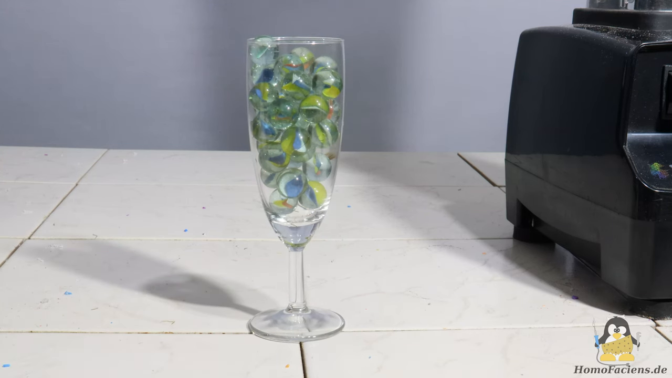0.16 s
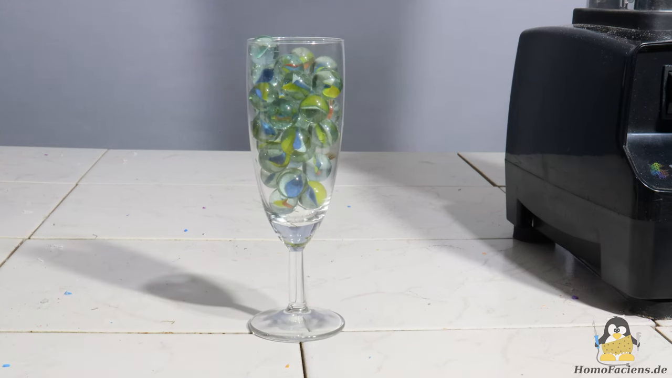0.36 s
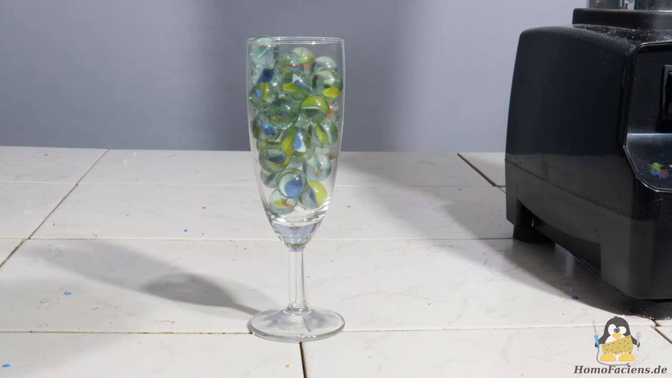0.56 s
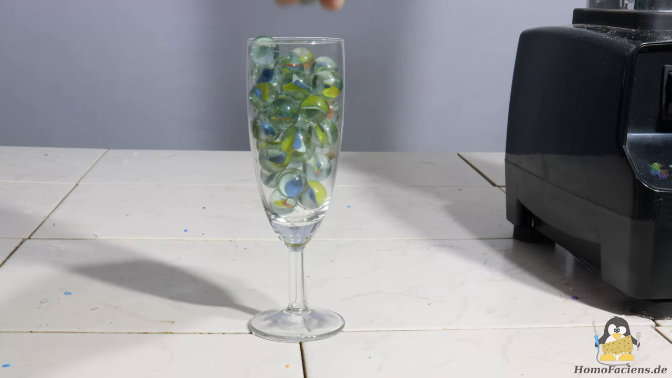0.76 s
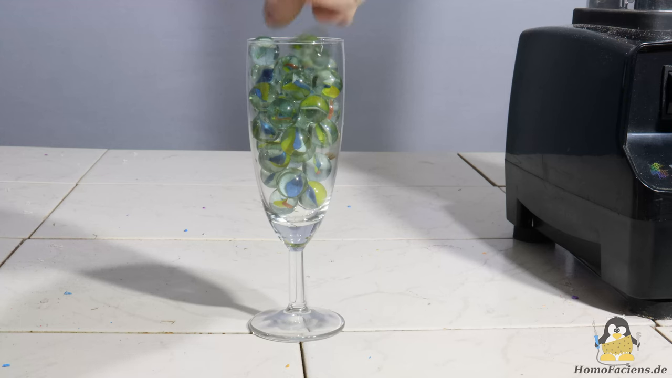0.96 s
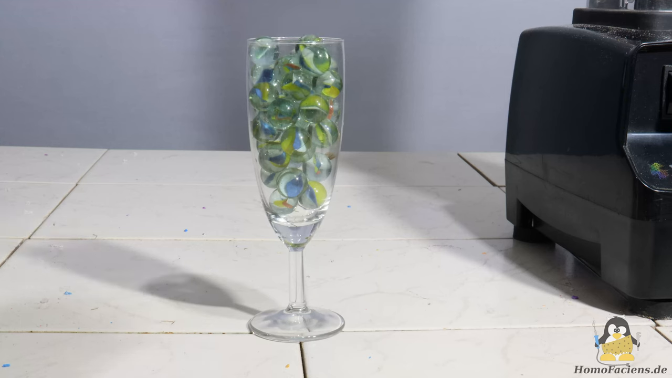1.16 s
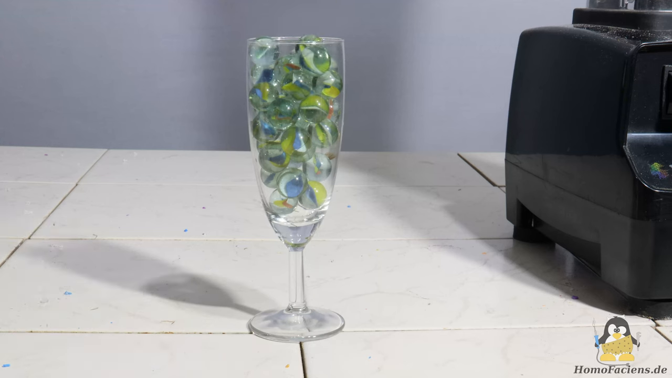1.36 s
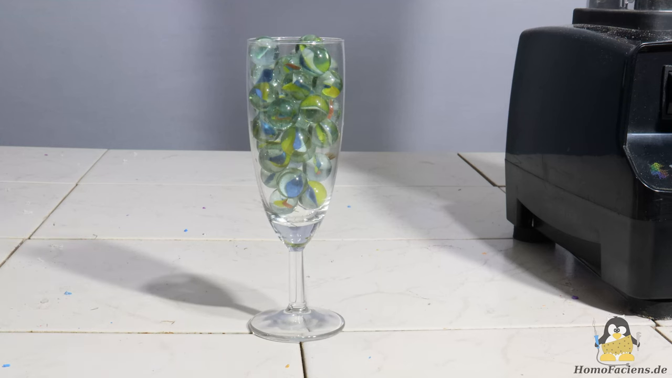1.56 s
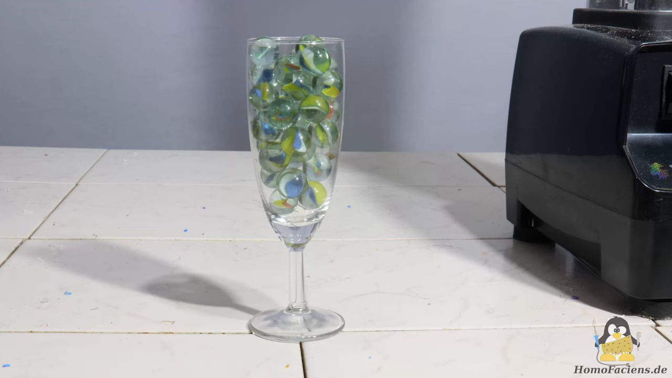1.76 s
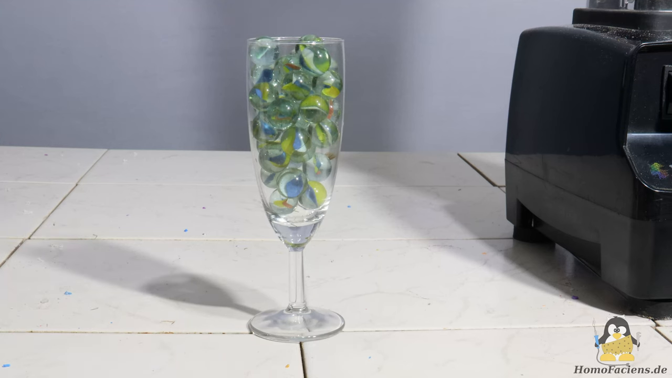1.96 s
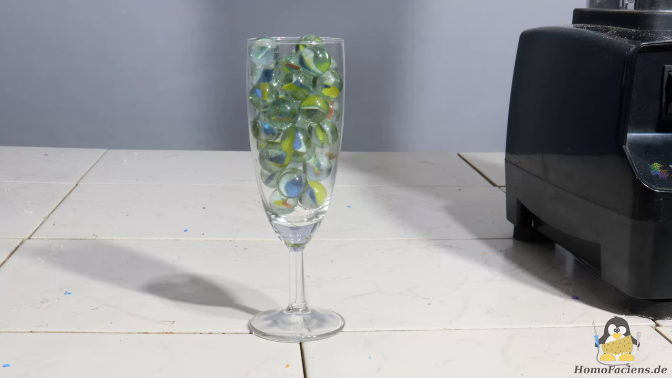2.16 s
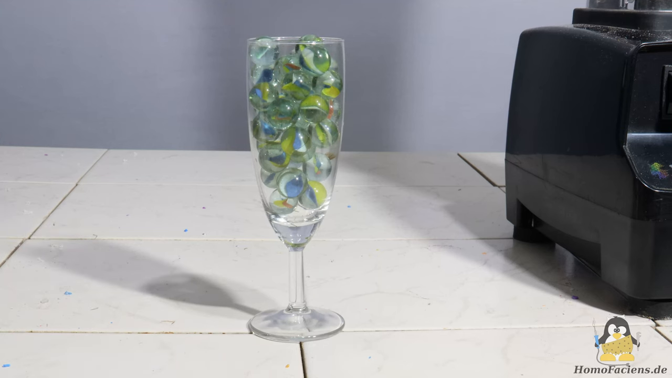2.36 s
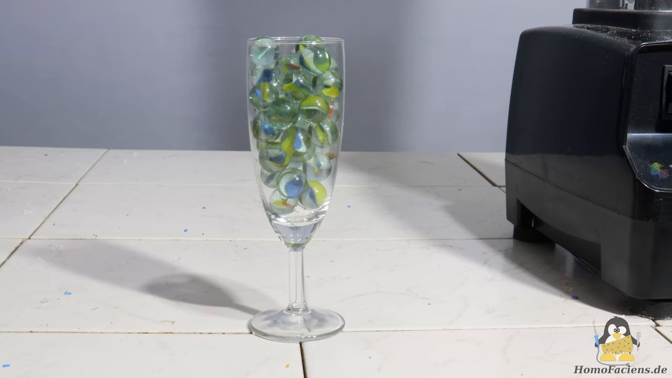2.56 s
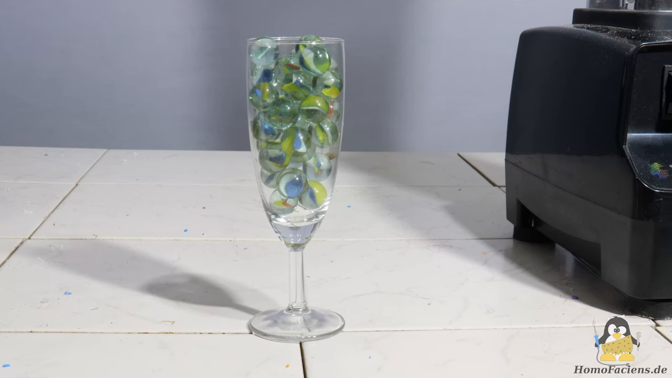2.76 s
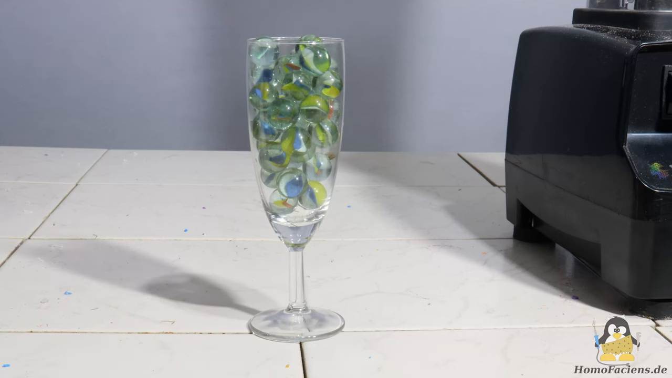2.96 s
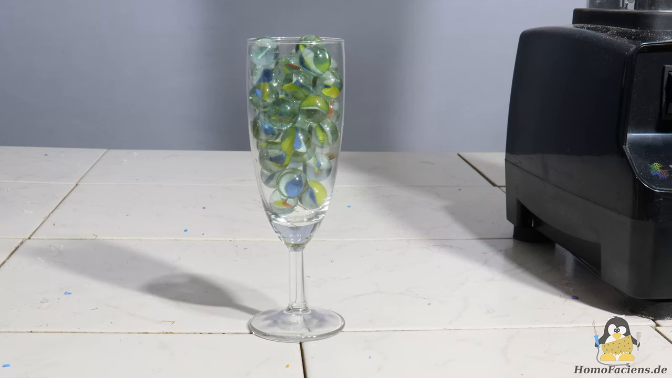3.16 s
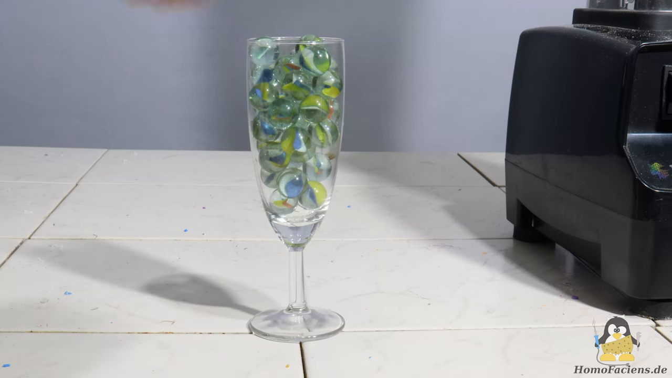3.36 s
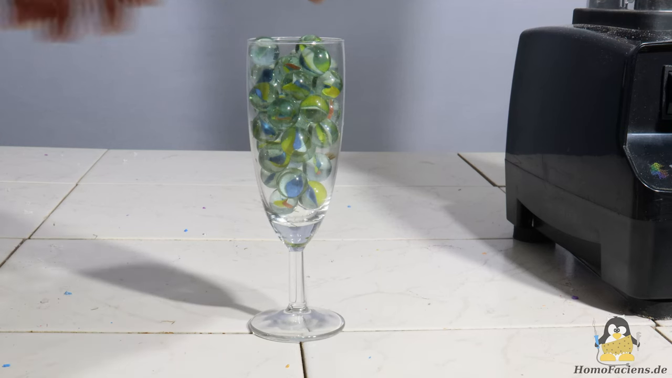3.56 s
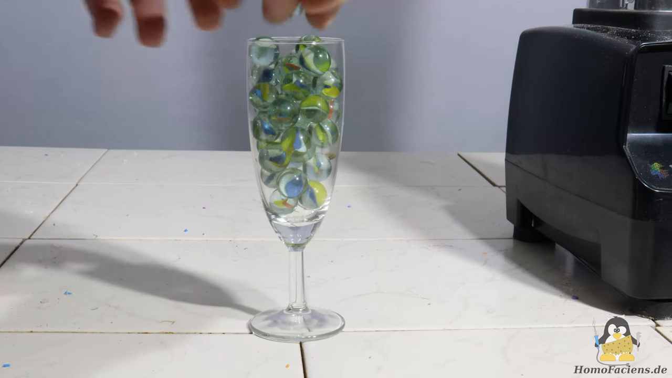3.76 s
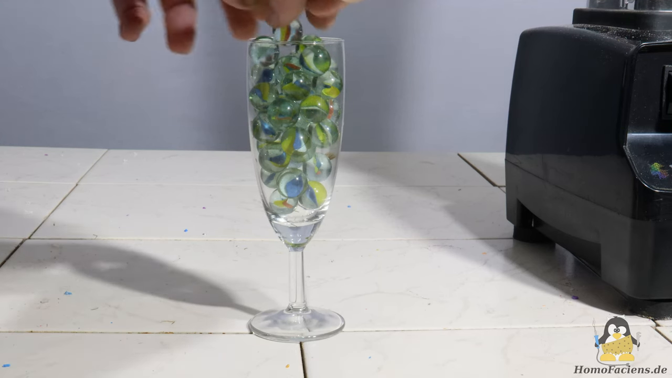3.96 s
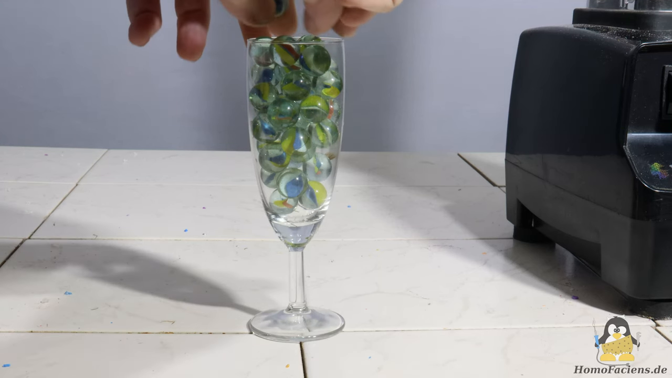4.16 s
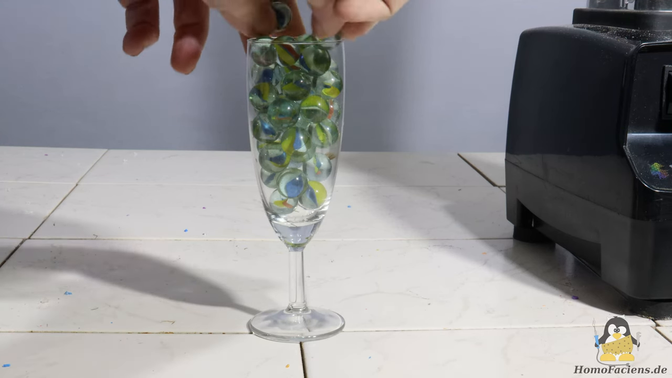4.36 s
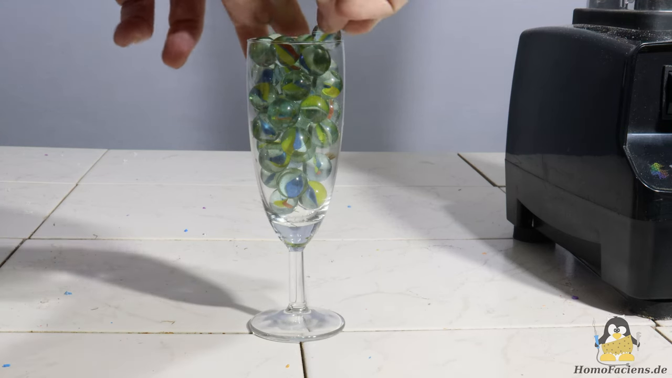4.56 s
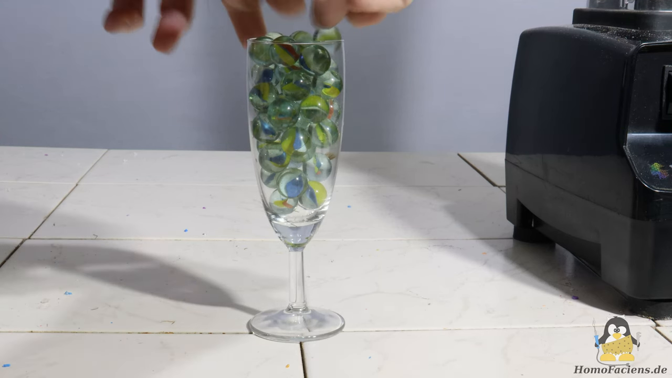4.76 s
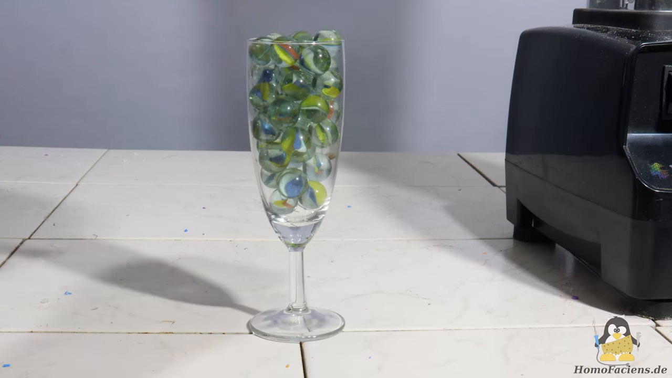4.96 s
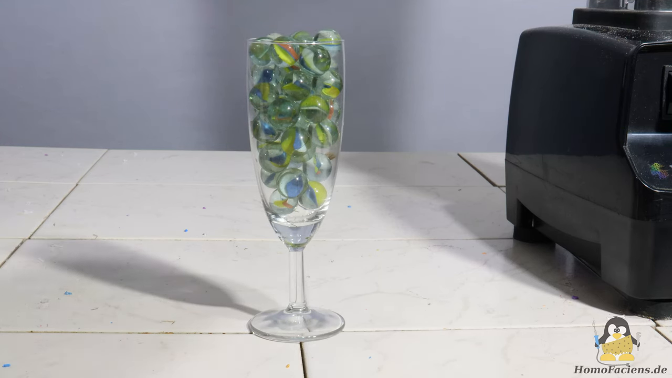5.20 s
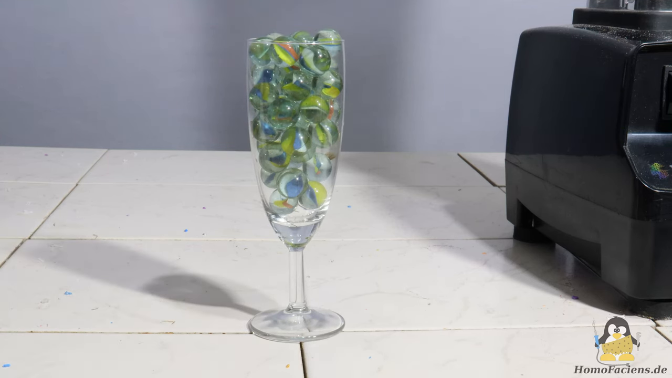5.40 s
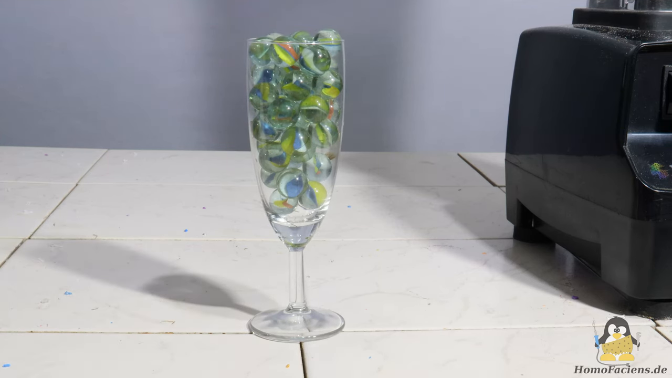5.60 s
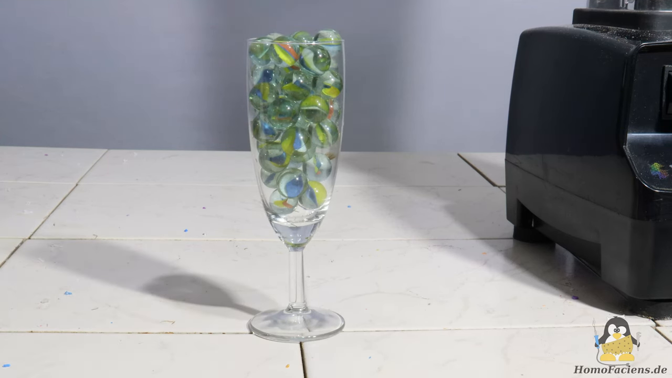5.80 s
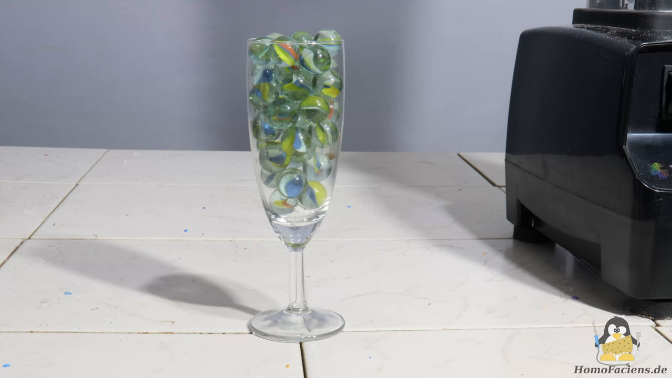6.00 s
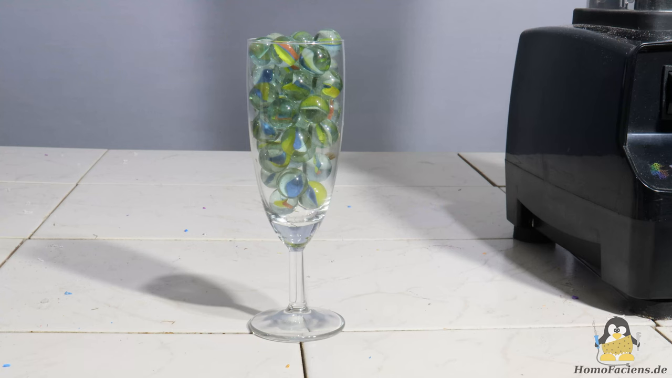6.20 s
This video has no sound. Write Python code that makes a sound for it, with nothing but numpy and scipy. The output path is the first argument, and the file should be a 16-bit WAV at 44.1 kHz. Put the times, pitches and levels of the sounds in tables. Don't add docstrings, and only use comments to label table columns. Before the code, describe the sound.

A faint, steady motor whirs on the right with slightly wavering midrange tones, over soft microphone hiss in a small room. From 0 s a hand rummages in a thin plastic bag close on the left: bright irregular crinkles and sharp snaps, with short scraping drags over a hard dish between 0.4 and 0.9 s. At 1.0 to 1.15 s marbles land on the heap in a full stem glass, a tight burst of hard, dry clacks and chatter, barely ringing, with a slight table thump. Crinkling resumes strongly from 1.4 to 3.1 s, with an especially loud snap near 2.5 s, then thins out. Soft sleeve rubbing passes at 3.2 to 3.8 s. Marbles clack at about 3.95, 4.2, 4.4, 4.6 and 4.9 s, with little settling ticks and a faint bag rustle near 4.8 s. Afterwards only whir and hiss remain until about 6 s.

```python
import sys
import numpy as np
from scipy import signal
from scipy.fft import rfft, irfft
from scipy.io import wavfile
from scipy.ndimage import uniform_filter1d

SR = 44100
rng = np.random.default_rng(int(sys.argv[2]) if len(sys.argv) > 2 else 0)


def materialize(psi):
    bounded = np.clip(np.atleast_2d(psi).T, -1, 1)
    quanta = np.round(bounded * 32767).astype(np.int16)
    wavfile.write(sys.argv[1], SR, quanta)


def voltage_ratio(level):
    return 10 ** (np.asarray(level, float) / 20)


N = 275163

# (frequency [Hz], density [dB per Hz])
CLACK_COLOUR = [(100, -27), (500, -21), (1400, -17), (2200, -9), (3600, -3), (5500, -2.5), (10000, -8),
                (15500, -13), (17000, -28)]


def evened(x):
    return x / np.sqrt(np.mean(x ** 2) + 1e-20)


def read(points, hz):
    f, value = np.transpose(points)
    return np.interp(np.log(hz + 1), np.log(f + 1), value)


def add(mix, s, sound):
    part = mix[:, round(s * SR):][:, :sound.shape[1]]
    part += sound[:, :part.shape[1]]


def colour(x, points):
    log_gain = np.log(voltage_ratio(read(points, abs(np.fft.fftfreq(4096, 1 / SR)))))
    taps = np.fft.ifft(np.exp(np.conj(signal.hilbert(log_gain)))).real[:2048]
    return signal.oaconvolve(x, taps[None], axes=1)[:, :x.shape[1]]


def resonate(x, hz, width):
    b, a = signal.iirpeak(min(hz, SR / 2.5), max(hz / width, .4), SR)
    return signal.lfilter(b, a, x)


def highpass(x, order, hz):
    return signal.lfilter(*signal.butter(order, hz, "high", fs=SR), x)


def air():
    # (frequency [Hz], density [dB per Hz])
    floor = [(20, -30.5), (60, -10.5), (120, -13), (350, -6), (700, -18), (1040, -16.5), (1500, -6),
             (2000, -14.5), (3500, -16), (4200, -21.5), (9000, -25.5), (14500, -24), (15900, -22),
             (16400, -40)]
    # (frequency [Hz], correlation [-1 to 1])
    likeness = [(60, 0.27), (240, 0.84), (950, -0.49), (3770, -0.186), (15000, -0.053)]
    # (frequency [Hz], left minus right [dB])
    balance = [(60, 2), (180, 4.5), (550, -4.5), (1650, 1), (4970, 6), (15000, -1.5)]
    floor_db = -71.5
    hz = np.fft.rfftfreq(N, 1 / SR)
    a, b = rfft(rng.standard_normal((2, N)))
    same = np.clip(read(likeness, hz), -1, 1)
    side = voltage_ratio(read(balance, hz) / 2)
    z = np.array([a * side, (same * a + np.sqrt(1 - same ** 2) * b) / side])
    return voltage_ratio(floor_db) * evened(irfft(z * voltage_ratio(read(floor, hz)), N))


def whir():
    housing_hz = [172, 600, 811, 1179, 1440, 1845, 2186, 3193, 1345, 2851, 750, 2350]
    # (hump width [Hz], hump level [dB], line level [dB], twin line level [dB], left minus right [dB])
    parts = [(21, -80, -88, -85, -8.5), (61, -74.5, -92.5, -87, -14.5), (50, -70, -73.5, -80.5, -10.5),
             (40, -75, -74.5, -81.5, -4), (330, -85.5, -86.5, -98, -8), (30, -89.5, -91.5, -99, 7),
             (30, -93.5, -91.5, -93.5, -10), (40, -93, -82, -84, -15.5), (40, -92.5, -94.5, -99, -11),
             (30, -105, -92, -110, -6), (58, -76.5, -105, -105, -10.5), (300, -98, -110, -110, -7.5)]
    shaft_hz = 25
    out = np.zeros((2, N))
    turn = 2 * np.pi * np.arange(N) / SR
    waver, bearing, stray = rng.standard_normal((3, N))
    bearings = np.array([bearing + .5 * stray, bearing])
    for hz, (width, hump_db, line_db, twin_db, pan_db) in zip(housing_hz, parts):
        twin_hz, middle_hz = hz + shaft_hz, hz + shaft_hz / 2
        line = np.sin(hz * turn) + 0.75 * evened(resonate(waver, hz, 9.0))
        twin = np.sin(twin_hz * turn) + 0.95 * evened(resonate(waver, twin_hz, 8.0))
        humps = evened(resonate(resonate(bearings, middle_hz, width), middle_hz, 1.6 * width))
        both = voltage_ratio(hump_db) * humps + voltage_ratio(line_db) * evened(line) + voltage_ratio(twin_db) * evened(twin)
        out += voltage_ratio([[pan_db / 2], [-pan_db / 2]]) * both
    return np.array([out[0], np.roll(out[1], 6)])


def room(x):
    # (frequency [Hz], decay by 60 dB [s])
    decay = [(150, 1), (400, 0.42), (1000, 0.54), (2800, 0.19), (7300, 0.17), (15000, 0.089)]
    length, gap = SR // 2, 12
    taps = np.zeros((2, length))
    starts = np.arange(130, length - gap, gap)
    at = starts + rng.integers(0, gap, (2, len(starts)))
    np.put_along_axis(taps, at, rng.choice([-1., 1.], at.shape), 1)
    hz, t, z = signal.stft(taps, SR, nperseg=128)
    same = 1 / (1 + (hz[:, None] / 5400.0) ** 2)
    z[1] = same * z[0] + np.sqrt(1 - same ** 2) * z[1]
    fall_db = -60 * t / read(decay, hz)[:, None]
    fall = voltage_ratio(fall_db) + voltage_ratio(-24.0 + 0.53 * fall_db)
    tail = signal.istft(z * fall, SR, nperseg=128)[1]
    tail /= np.linalg.norm(tail, axis=1, keepdims=True)
    return signal.fftconvolve(x[None], tail, axes=1)[:, :N]


def sleeve():
    # (time [s], level [dB])
    reach = [
        (3.199, -66.5),
        (3.45, -67.5),
        (3.701, -67),
        (3.95, -84),
        (4.4, -84.5),
        (4.85, -83.5),
        (5.05, -85.5),
    ]
    # (frequency [Hz], density [dB per Hz])
    cloth = [(120, -16.5), (330, 3.5), (700, -12), (2000, -4.5), (4000, -12), (9000, -29.5)]
    s, db = np.transpose(reach)
    rub = evened(colour(rng.standard_normal((1, N)), cloth)[0])
    level = voltage_ratio(np.interp(np.arange(N) / SR, s, db, -120, -120))
    return level * np.array([rub, .6 * np.roll(rub, 4)])


def drags():
    # (frequency [Hz], width [Hz], level [dB])
    dish = [(1680, 130, -2), (2600, 150, -8), (4450, 260, 0), (9750, 450, -1)]
    # (start [s], end [s], level [dB])
    slips_at = [
        (0.427, 0.486, -49.5),
        (0.53, .60, -52.5),
        (0.677, .765, -52),
        (0.821, .90, -43.5),
    ]
    slips = rng.standard_normal(SR) * (rng.random(SR) < 600. / SR)
    rung = evened(sum(voltage_ratio(db) * evened(resonate(slips, hz, width)) for hz, width, db in dish))
    out = np.zeros((1, N))
    for start, end, db in slips_at:
        part = rung[None, round(start * SR):round(end * SR)]
        add(out, start, voltage_ratio(db) * part * signal.windows.tukey(part.shape[1], .4))
    return out


def hand():
    # (start [s], length [s], first level [dB], last level [dB], low folds minus crinkle [dB])
    strokes = [(0.0, 0.041, -38, -45.5, -4.5), (0.039, 0.038, -46.5, -51, -2.5),
               (0.081, 0.11, -47, -41.5, -1.5), (.185, 0.066, -45.5, -43, -7),
               (.255, .075, -41.5, -41.5, -9.5), (0.327, 0.052, -58, -46.5, 3.5),
               (0.394, 0.042, -49, -51.5, -1.5), (0.438, .085, -44.5, -55, 4), (0.551, 0.14, -44, -63, -2),
               (0.672, 0.12, -49, -60, -0.5), (0.806, 0.36, -51, -64, 2), (1.113, 0.11, -49, -62.5, -1.5),
               (1.204, 0.167, -70, -61, 7), (1.381, 0.061, -44.5, -59.5, -2),
               (1.441, 0.12, -56.5, -42.5, 0), (1.579, .035, -48.5, -43, -5.5),
               (1.613, 0.13, -38.5, -46, -6.5), (1.742, 0.032, -44, -37, -3),
               (1.777, 0.096, -43.5, -56.5, -7), (1.862, 0.14, -45.5, -43, -7), (2.002, .22, -48, -46, -5),
               (2.221, 0.073, -45.5, -43.5, -3), (2.297, 0.174, -50, -44, -5.5),
               (2.474, 0.039, -37, -50, -1.5), (2.537, 0.195, -54.5, -48.5, -2.5),
               (2.598, 0.018, -46.5, -47, 4), (2.674, 0.018, -50, -47, -2),
               (2.735, 0.068, -41, -42.5, -2.5), (2.797, 0.053, -45, -48.5, -4),
               (2.851, 0.091, -52, -47, -4), (2.946, 0.082, -44.5, -45, -11), (3.003, 0.084, -58, -49.5, 4),
               (3.141, 0.077, -62, -50.5, -1.5), (3.241, 0.089, -53.5, -82, 7),
               (4.708, 0.22, -70.5, -56.5, 8)]
    grip_s, let_go_s = .008, 0.014
    t, level, low = np.arange(N) / SR, np.zeros(N), np.zeros(N)
    for start, length, first_db, last_db, low_db in strokes:
        end = start + length
        shape = np.clip(np.minimum((t - start) / grip_s + .5, (end - t) / let_go_s + .5), 0, 1)
        stroke = shape * voltage_ratio(np.interp(t, [start, end], [first_db, last_db]))
        level += stroke
        low += stroke * voltage_ratio(low_db)
    return level, low


def crinkle(per_s, lo_hz, hi_hz, spread_db, clump_db, cycles):
    clumps = evened(uniform_filter1d(uniform_filter1d(rng.standard_normal(N), 500), 500))
    size = voltage_ratio(spread_db * np.minimum(rng.exponential(1, N), 4) + clump_db * clumps)
    size *= (rng.random(N) < per_s / SR) * np.sign(rng.random(N) - .5)
    kinds = 12
    kind, out = rng.integers(0, kinds, N), np.zeros(N)
    for k, hz in enumerate(np.geomspace(lo_hz, hi_hz, kinds)):
        pole = np.exp((2j * np.pi - 1 / cycles) * hz / SR)
        grain = signal.lfilter([0, pole.imag], [1, -2 * pole.real, abs(pole) ** 2], size * (kind == k))
        out += np.sqrt(hz) * grain
    return evened(out)


def patchy(x):
    z = signal.stft(x, nperseg=256)[2]
    field = rng.standard_normal(z.shape)
    field = uniform_filter1d(uniform_filter1d(field, size=15, axis=1), size=20, axis=2)
    field = uniform_filter1d(uniform_filter1d(field, size=9, axis=1), size=8, axis=2)
    patch_db = 2.1
    return signal.istft(z * voltage_ratio(patch_db * evened(field)), nperseg=256)[1][:, :N]


def chance_snaps(level):
    count, rummage_s, lo_hz, hi_hz = 130, 3.1, 2500, 14000
    over_db, spread_db = 3.5, 3.5
    when, size, pitch = rng.random((count, 3)).T
    s = when * rummage_s + 0.0027
    crinkle_db = 20 * np.log10(level[(s * SR).astype(int)] + 1e-6)
    db = crinkle_db + over_db + spread_db * np.minimum(-np.log(size), 2.5)
    return list(zip(s, db, lo_hz * (hi_hz / lo_hz) ** pitch))


def snap(row, noise):
    s, db, hz = row
    t = np.arange(len(noise)) / SR
    lasts = 0.0003 + 2.8 / hz * voltage_ratio(.55 * (db + 25))
    rise = .0005
    burst = noise * np.exp(-np.maximum(t - rise, 0) / lasts) * np.minimum(t / rise, 1) ** 2
    body = resonate(resonate(burst, hz, 1200.0 + 0.83 * hz), hz, 8900.0)
    wide = highpass(burst, 2, hz)
    sound = body / abs(body).max() + 0.36 * wide / abs(wide).max()
    return s - rise, voltage_ratio(db) * sound[None] / abs(sound).max()


def bag():
    # (time [s], peak
    # [dB], pitch [Hz])
    snaps = [(0.027, -22, 4900), (0.1706, -16.5, 11000), (0.2508, -23, 12400), (0.339, -28, 6100),
             (0.3764, -29, 12600), (0.4023, -18.5, 11600), (0.436, -19, 10000), (0.5527, -17, 13400),
             (0.6279, -23, 11800), (0.6495, -24.5, 8600), (0.685, -17.5, 14800), (0.837, -25, 9750),
             (0.8434, -23, 9500), (0.8928, -17.5, 6040), (1.3852, -25.5, 6550), (1.3908, -26, 2140),
             (1.467, -18.5, 7100), (1.5352, -25.5, 2540), (1.6225, -15, 10600), (1.6392, -21, 10800),
             (1.6445, -15, 8900), (1.662, -17, 11600), (1.869, -19, 3330), (1.9159, -18.5, 11200),
             (2.4574, -20.5, 4760), (2.4791, -18, 14600), (2.4835, -8.5, 3760), (2.7973, -20.5, 4560),
             (2.8351, -22, 13200), (2.9648, -22, 9500),
             (0.5217, -25.5, 4430), (0.5254, -28, 4250), (0.5766, -31, 4050), (0.606, -28, 11900),
             (0.632, -34.5, 2600), (0.681, -32, 2500), (0.752, -26.5, 8700), (0.798, -25.5, 7200),
             (0.814, -34, 9800), (0.9488, -32, 7950), (1.217, -37, 6260), (1.261, -42, 3100),
             (1.2912, -32.5, 3320), (1.345, -29.5, 3430), (1.3523, -29.5, 12300), (1.4094, -29, 13800),
             (1.4754, -23, 13900), (1.483, -25, 1830), (1.9268, -25, 1950), (3.0861, -29, 1720),
             (3.094, -26, 6770), (3.1566, -36.5, 2700), (3.1715, -31.5, 6950), (3.1847, -40, 3900),
             (3.201, -32, 7750), (3.214, -45, 3500), (3.2534, -30, 7950), (3.3624, -36, 4540),
             (3.414, -34.5, 3320), (3.428, -41.5, 1930),
             (0.0391, -25, 5800), (0.0693, -22, 2500), (0.083, -29, 11500), (0.0858, -25, 4670),
               (0.128, -43, 4500), (0.2069, -36, 9600), (0.2384, -23, 12300), (0.345, -33, 5300),
               (0.3535, -26, 6000), (0.3639, -33, 2600), (0.397, -29, 9100), (0.8034, -46, 6930),
               (0.9154, -34, 4394), (1.2688, -37.5, 10900), (1.3024, -40, 4800), (1.3129, -35, 4500),
               (1.4222, -32.5, 3680), (1.442, -37, 3400), (1.4567, -33, 2900), (1.4912, -30, 3400),
               (1.51, -24, 4000), (1.574, -31.5, 1600), (1.599, -26, 9400), (1.6988, -31, 12800),
               (1.729, -28, 7100), (1.8165, -22, 11200), (1.8334, -26.5, 6300), (1.8444, -29, 4200),
               (1.9456, -25, 14100), (2.0307, -27, 9600), (2.1127, -39, 14900), (2.1687, -26, 11100),
               (2.2838, -29, 9750), (2.305, -42, 5760), (2.3234, -27, 2140), (2.3348, -23, 14100),
               (2.3637, -30.5, 5620), (2.3725, -24.5, 3960), (2.3853, -26, 9560), (2.403, -24, 14040),
               (2.4155, -30, 3800), (2.4223, -31, 2730), (2.4882, -26, 4700), (2.5579, -47, 3940),
               (2.59, -32, 11400), (2.624, -25.5, 14200), (2.6335, -33.5, 3400), (2.6566, -36, 5200),
               (2.6734, -25, 13400), (2.681, -30, 10700), (2.7183, -30, 9300), (2.8394, -25, 13100),
               (2.8633, -28.5, 5300), (2.9735, -29, 11900), (2.9833, -23, 10600), (3.1607, -49, 5400),
               (3.2044, -32.5, 4300), (3.2511, -32, 1600), (3.2743, -37, 1600), (3.4171, -55, 3290)]
    # (frequency [Hz], density [dB per Hz])
    film_colour = [(59, -51), (100, -16.5), (186, -17.5), (642, 9), (1030, 12), (2680, -4), (4880, -6.5),
                   (5920, -7), (15900, -4), (17500, -11.5)]
    # (frequency [Hz], loss [dB])
    shadow = [(150, 1), (600, 4), (1300, 11), (4000, 9.5), (8000, 20), (15000, 18.5)]
    level, low = hand()
    fine = highpass(crinkle(4000., 2010.0, 17000.0, spread_db=2.0, clump_db=1.2, cycles=0.88), 2, 2800)
    fine = evened(colour(fine[None], film_colour))
    folds = highpass(crinkle(1500., 420.0, 2800., spread_db=3.7, clump_db=1.3, cycles=0.19), 1, 230)
    film = voltage_ratio(4.0) * level * fine + voltage_ratio(-9.5) * low * folds
    film = patchy(film) + drags()
    rows = snaps + chance_snaps(level)
    for row, noise in zip(rows, rng.standard_normal((len(rows), 800))):
        add(film, *snap(row, noise))
    far = colour(film, [(hz, -db) for hz, db in shadow])
    return np.array([film[0], np.roll(far[0], 8)])


def ring(modes, t, chance):
    detune, scatter_db, swell = .015, 1.5, 1.7
    out = np.zeros(len(t))
    for (hz, db, t60), c in zip(modes, chance):
        envelope = voltage_ratio(db + scatter_db * c - 60 * t / t60) * (1 - np.exp(-t * hz / swell))
        out += envelope * np.sin(2 * np.pi * hz * (1 + detune * c) * t)
    return out


def clack(row, noise):
    # (frequency [Hz], level [dB], decay by 60 dB [s])
    wall = [(2150, -3, .035), (3300, -4, .03), (3600, 0, .06)]
    # (frequency [Hz], level [dB], decay by 60 dB [s])
    table_top = [(140.7, -12.5, 0.072), (167, -9.5, 0.17), (192, -10.5, 0.19), (213, -11.5, 0.16),
                 (296, -13, .15), (409, -10.5, 0.1), (617.6, -19.5, .05), (850, -6.5, 0.085)]
    s, db, hz, treble_db, thump_db, pan_db = row
    t = np.arange(noise.shape[1]) / SR
    shared = 0.58
    jostle = np.array([noise[0], shared * noise[0] + np.sqrt(1 - shared ** 2) * noise[1]])
    jostle[:, 0] = 2.93
    jostle = colour(jostle, CLACK_COLOUR)
    echo_s, echo_share = .0007, 0.5
    late_s = (np.round(hz * echo_s - .5) + .5) / hz
    blow = jostle * np.exp(-t / 0.0017)
    blow = blow - echo_share * np.array([np.interp(t - late_s, t, port, 0) for port in blow])
    settling = jostle * voltage_ratio(-16.5 - 60 * t / 0.079)
    heap = resonate(blow, hz, 700.0)
    treble = highpass(blow + settling, 2, 6500)
    sound = (0.57 * (blow + settling) + voltage_ratio(treble_db) * treble) / abs(blow).max()
    sound = sound + 0.3 * heap / abs(heap).max()
    sound = sound / abs(sound).max()
    sound = sound + voltage_ratio(-27.0) * ring(wall, t, noise[2]) + voltage_ratio(thump_db) * ring(table_top, t, noise[3])
    sound[1, 2:] = sound[1, :-2]
    pan = voltage_ratio([[pan_db / 2], [-pan_db / 2]])
    return s, voltage_ratio(db + 1.5) * pan * sound * np.linspace(1, 0, len(t))


def marbles():
    # (time [s], peak [dB], pitch of the heap [Hz], treble share [dB], table thump minus peak [dB])
    landings = [(1.0097, -11.5, 3430, -4.5, -32.5), (1.0453, -17, 3570, -6.5, -25),
                (1.0735, -17, 3770, 2, -23), (1.1473, -22.5, 3800, 0, -24.5), (3.945, -12.5, 3264, -1, -26),
                (4.1564, -22, 3430, -10.5, -22.5), (4.2177, -15, 3350, -6, -27),
                (4.4155, -13.5, 3795, 0, -23), (4.609, -16, 6300, 4, -21.5), (4.6207, -19.5, 2400, 4, -25),
                (4.8204, -30, 3750, -15, -16), (4.8802, -21.5, 4100, -11.5, -22)]
    # (time [s], peak [dB], pitch of the heap [Hz], treble share [dB])
    rebounds = [(1.0163, -15.5, 2290, 1), (1.0615, -19, 5300, 5), (1.07, -19.5, 3690, -5),
                (1.18, -47, 5600, 3), (3.9526, -15.5, 3670, -1.5), (4.0284, -34, 3520, -21.5),
                (4.2121, -28.5, 3530, 0), (4.2201, -20.5, 2000, -4), (4.4225, -19.5, 2220, -9.5),
                (4.467, -32, 5470, -6), (4.5272, -42, 4700, -7.5), (4.54, -41, 6440, -7.5),
                (4.6164, -12.5, 3800, -10), (4.6422, -18, 2500, 5.5), (4.789, -44.5, 5000, 12),
                (4.862, -45, 7500, 8), (4.8725, -41, 5450, 5), (4.894, -42, 3700, -6),
                (4.902, -31.5, 3740, -7), (1.0783, -24.5, 3605, -12), (1.081, -20.5, 3580, 3),
                (4.8843, -35, 5030, 2), (4.551, -53, 4930, -9.5), (4.13, -56, 4000, -9)]
    rebound_thump_db = -32
    landing_pan_db, rebound_pan_db, pan_scatter_db = 4, 4.5, -2.5
    out, blows = np.zeros((2, N)), np.zeros((1, N))
    rows = [(*row, landing_pan_db) for row in landings]
    rows += [(*row, rebound_thump_db, rebound_pan_db) for row in rebounds]
    for (*row, pan_db), noise in zip(rows, rng.standard_normal((len(rows), 4, 6000))):
        s, sound = clack((*row, pan_db + pan_scatter_db * noise[2, -1]), noise)
        add(out, s, sound)
        add(blows, s, np.array([[np.linalg.norm(sound) * np.sign(noise[0, 0])]]))
    tick = colour(signal.unit_impulse((1, 2048), (0, 0)), CLACK_COLOUR)
    return out, colour(blows, CLACK_COLOUR) / np.linalg.norm(tick)


def scene():
    heap, blows = marbles()
    film = bag()
    to_walls = voltage_ratio(-15.0) * blows[0] + voltage_ratio(-16.5) * heap[0] + voltage_ratio(-15.5) * film[0]
    near = heap + film + sleeve() + room(to_walls)
    near = signal.sosfilt(signal.butter(3, 115, "high", fs=SR, output="sos"), near)
    return near + whir() + air()


def low_pass(x):
    return signal.sosfilt(signal.butter(12, 17000, fs=SR, output="sos"), x)


def record(dry):
    edge_hz, top_hz = 15950, 16850
    leak_db, sudden = -8, 5.0
    ceiling = .33
    soft = ceiling * np.tanh(dry / ceiling)
    edge = signal.firwin(511, edge_hz, window=("kaiser", 5), fs=SR)
    limited = signal.oaconvolve(soft, edge[None], "same")
    wider = signal.firwin(511, top_hz, window=("kaiser", 9), fs=SR)
    top = signal.oaconvolve(soft, wider[None], "same") - limited
    power = (top ** 2).sum(0)
    lifted = uniform_filter1d(power, size=128) > sudden * uniform_filter1d(power, size=2500)
    limited = limited + voltage_ratio(leak_db) * uniform_filter1d(1. * lifted, size=200) * top
    return low_pass(limited)


dry = scene()
out = record(dry)
materialize(out)
```